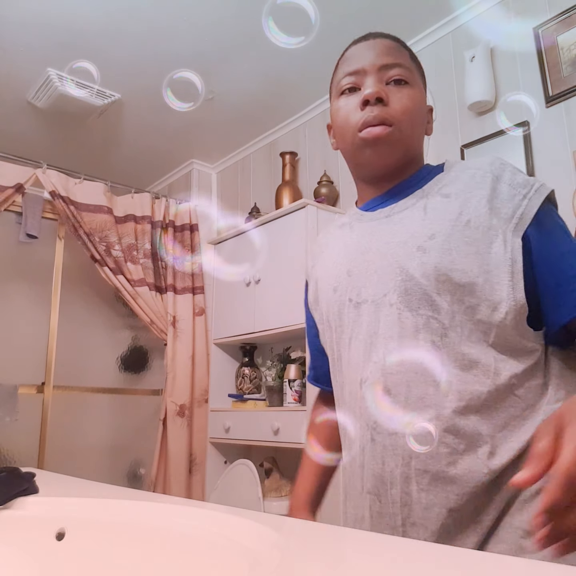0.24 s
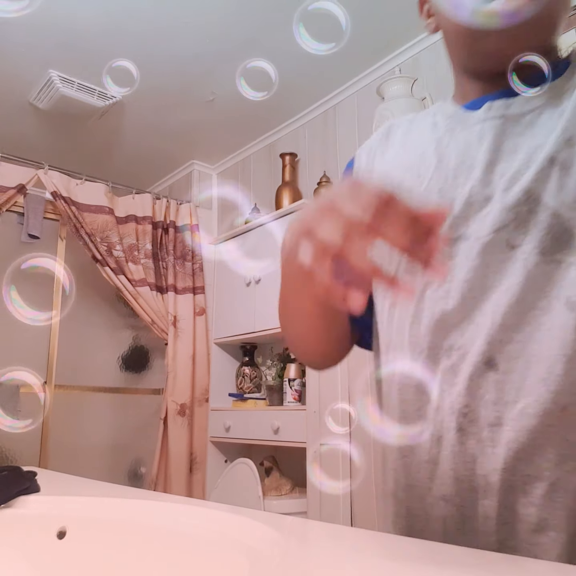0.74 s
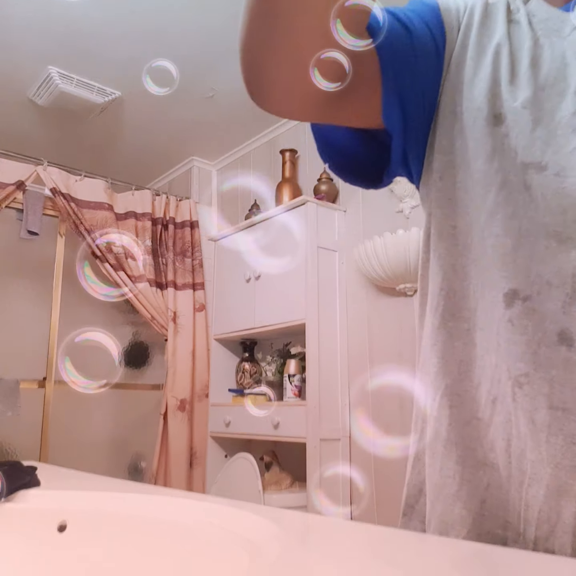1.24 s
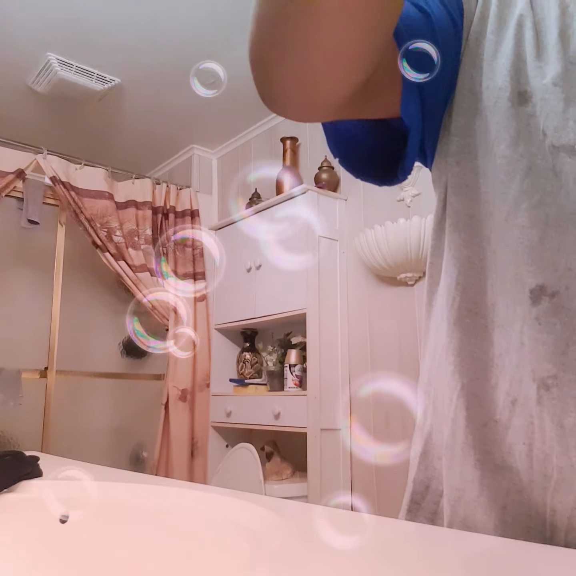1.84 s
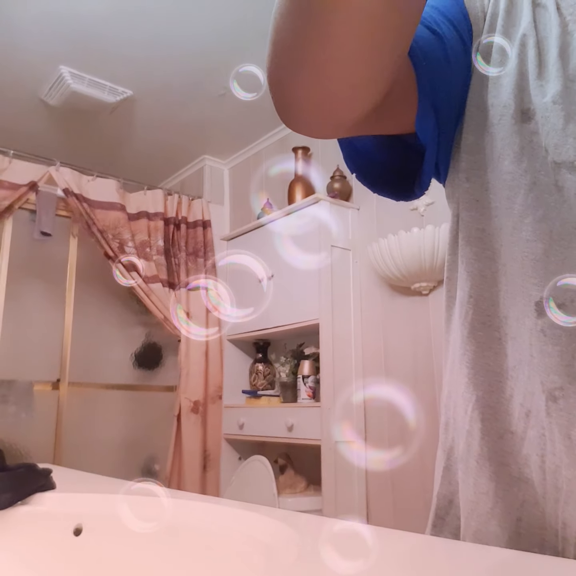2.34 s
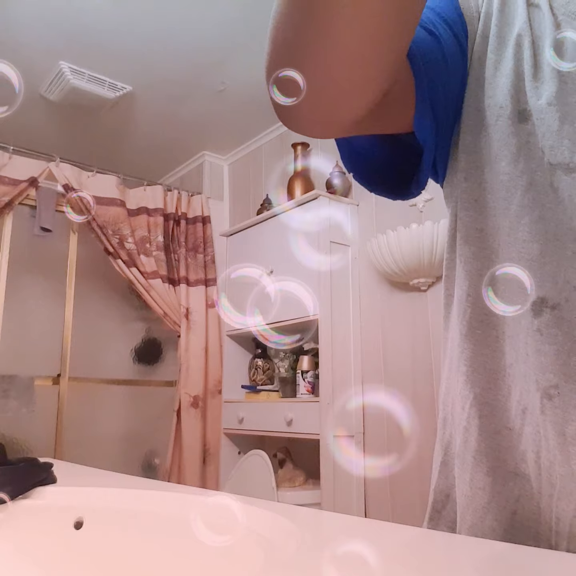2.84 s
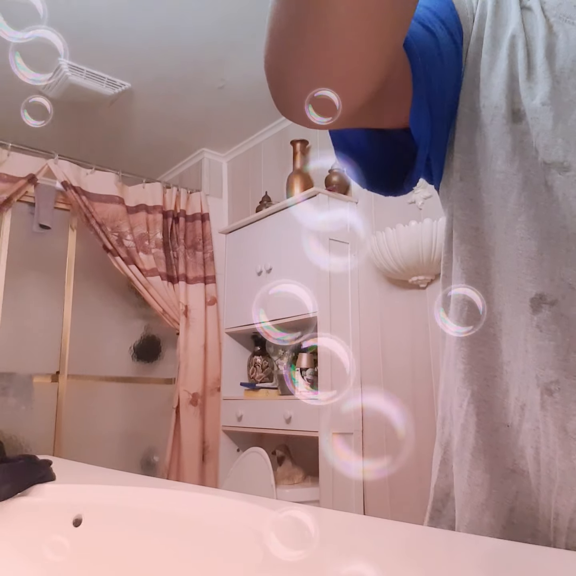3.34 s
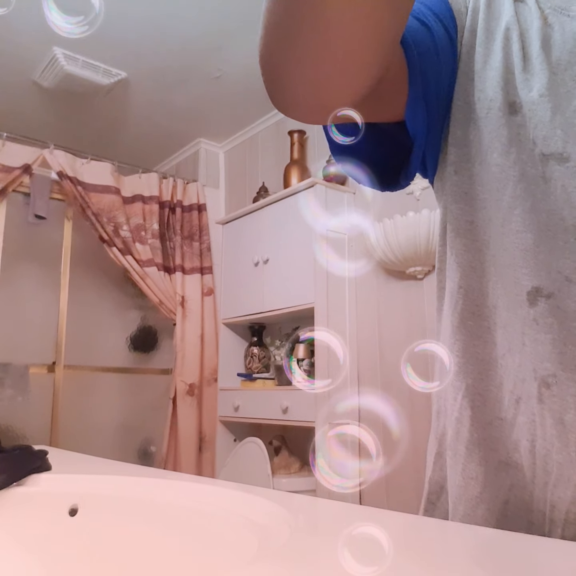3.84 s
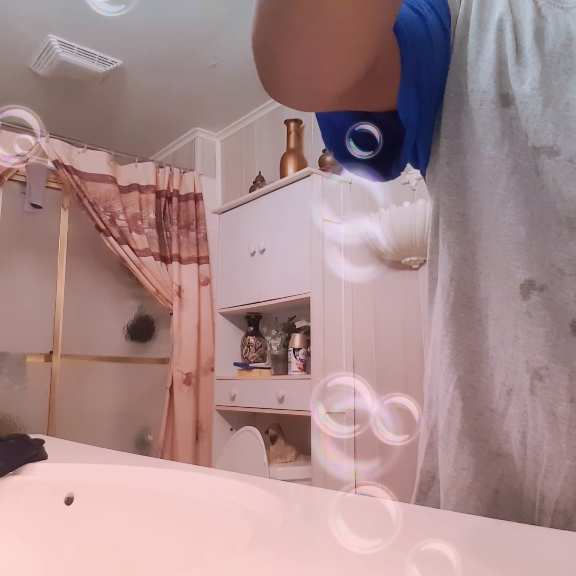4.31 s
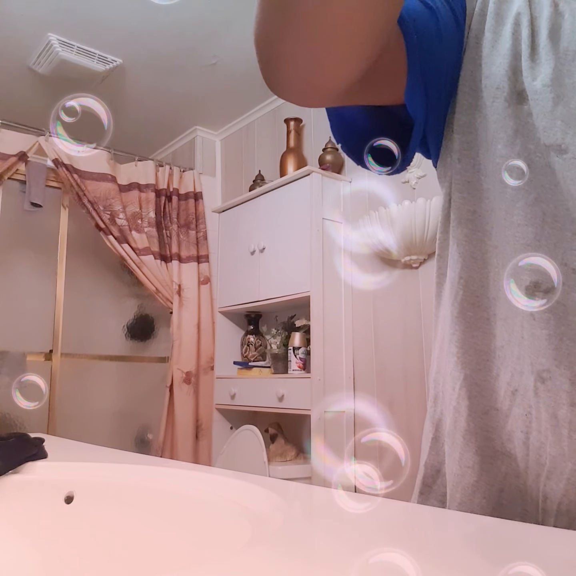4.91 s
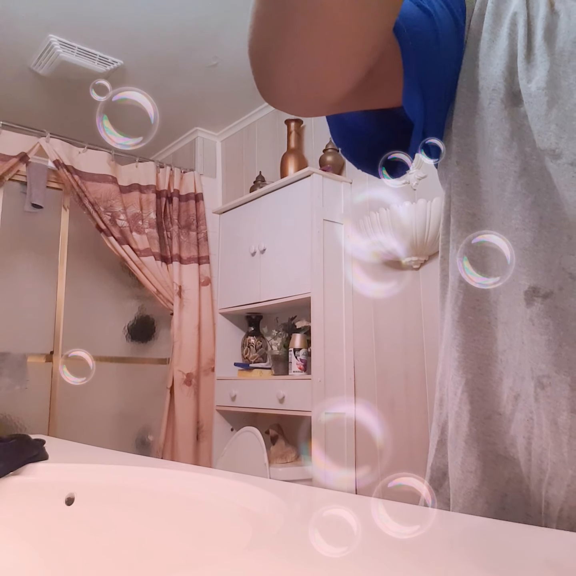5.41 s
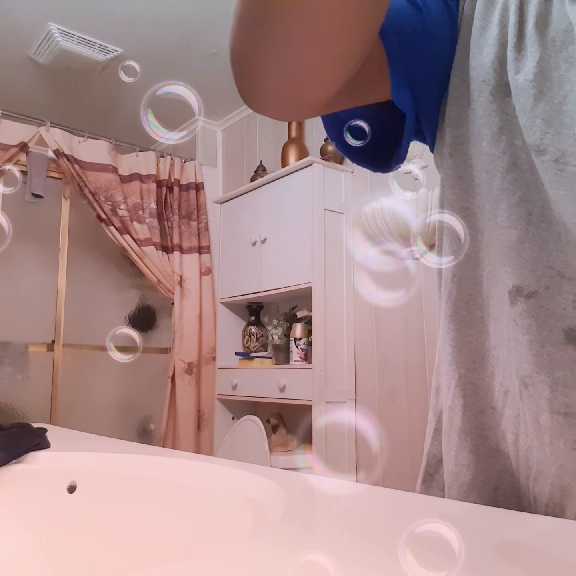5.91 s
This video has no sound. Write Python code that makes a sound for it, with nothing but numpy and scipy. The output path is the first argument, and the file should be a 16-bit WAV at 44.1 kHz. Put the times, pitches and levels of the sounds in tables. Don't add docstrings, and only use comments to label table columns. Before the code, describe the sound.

After faint rumble and hiss, a paper towel is crumpled sharply with snaps and knocks close to the microphone, then smoothed in lighter rustles.

```python
import sys
import numpy as np
from scipy import signal
from scipy.fft import rfft, irfft
from scipy.io import wavfile

SR = 44100
rng = np.random.default_rng(int(sys.argv[2]) if len(sys.argv) > 2 else 0)


def level_to_linear(level):
    exponent = np.asarray(level, float) / 20
    return 10 ** exponent


def to_wav(sig):
    pcm = np.clip(np.atleast_2d(sig), -1, 1) * 32767
    pcm = np.round(pcm).astype(np.int16)
    wavfile.write(sys.argv[1], SR, pcm.T)


N = 271656

# peak t/s, fibre level/dB, swell/s per 10 dB, fade/s per 10 dB, casing ring re fibre/dB
CRUMPLE_STROKES = [(1.3, -65, .1, .6, 3), (1.445, -56, .01, .1, 4), (1.56, -57, .2, .3, 3),
                   (1.69, -53, .1, .15, 5), (1.885, -46, .13, .14, 9), (2.01, -47, .03, .12, 5),
                   (2.096, -50, .006, .3, 8), (2.117, -51, .3, .02, 8), (2.17, -58, .1, .3, 13),
                   (2.246, -50, .004, .3, 9), (2.302, -47.5, .1, .05, 6), (2.38, -50, .04, .05, 12),
                   (2.402, -35, .002, .3, 0), (2.522, -36.5, .02, .08, 0), (2.575, -37, .12, .3, 0),
                   (2.657, -38, .02, .08, 0), (2.74, -42, .02, .1, 0), (2.82, -39, .06, .12, 1),
                   (2.9, -45, .3, .25, 3), (2.982, -51, .5, .04, 3), (3.07, -51, .15, .06, 3),
                   (3.15, -57, .05, .12, 15), (3.199, -39, .003, .08, 9), (3.233, -50, .1, .025, 8),
                   (3.29, -61, .1, .2, 8), (3.365, -49, .022, .2, 10), (3.43, -41, .07, .1, 10),
                   (3.486, -49, .3, .016, 10), (3.505, -53, .004, .2, 15), (3.531, -40, .003, .9, 6),
                   (3.56, -39, .1, .9, 5), (3.66, -37.5, .5, .1, 6), (3.738, -46, .25, .01, 9)]
SMOOTHING_STROKES = [(3.83, -52, .15, .04, 14), (3.93, -52, .1, .15, 14), (4.015, -52.5, .02, .25, 14),
                     (4.13, -61, .2, .04, 17), (4.26, -63, .1, .3, 10), (4.345, -58, .04, .4, 4),
                     (4.4, -61, .4, .03, 4), (4.49, -63, .1, .3, 8), (4.59, -57, .05, .3, 6),
                     (4.718, -49.5, .08, .15, 5), (4.84, -52, .1, .15, 5), (5.02, -58, .15, .5, 10),
                     (5.175, -53, .14, .15, 13), (5.255, -51, .015, .08, 12), (5.316, -52, .004, .2, 12),
                     (5.357, -48, .02, .06, 13), (5.398, -48, .005, .3, 12), (5.435, -51, .3, .01, 12),
                     (5.5, -57, .4, .4, 6), (5.578, -48, .012, .15, 10), (5.64, -46, .1, .04, 10),
                     (5.69, -54, .1, .3, 12), (5.749, -47, .003, .11, 11), (5.89, -55, .1, .3, 6),
                     (5.927, -50, .004, .2, 8), (6.03, -48, .005, .3, 6), (6.125, -44.5, .06, .5, 14)]
# t/s, pressure/dB, skin slip re pressure/dB, cupping toward the high mode/dB, lean left-right/dB
GRIP = [(0.0, -46, -19, 0, 1.5), (0.21, -42, -15, 0, 4.5), (0.4, -49, -32, 0, 4), (1.15, -48, -21, 0, 2),
        (1.42, -45, -16, -2, 3), (2.0, -49, -7, -6, 7), (2.38, -44, -10, -5, 5), (2.55, -41, -17, 5, 5),
        (2.72, -43, -5, -4, 19), (2.95, -42, -9, -3, 13), (3.5, -48, -6, 4, 9), (3.66, -51, -3, 0, 1),
        (4.15, -54, -5, -4, 1), (5.03, -55, -3, -5, -1), (5.08, -40, -15, 2, 0), (5.33, -44, -10, 1, 0),
        (5.45, -55, 3, 5, -0.5), (6.16, -58, 0, 6, -0.5)]
# f/Hz, width/Hz, left-right likeness
CASING_MODES = [(1220, 300, .7), (1660, 400, .4)]
MODE_DB = [-2.2, -1.2]
# f/Hz, level/dB per Hz
FIBRE_COLOUR = [(1500, -5), (2200, -8), (3500, -9.5), (4950, -15.5), (6500, -18), (8000, -20)]
# f/Hz, level/dB per Hz
SIZZLE_COLOUR = [(6500, -24.5), (7600, -20.5), (9000, -3.5), (10400, -1.5), (12500, -1.5), (15800, -4)]
FOLD_EDGES = [1400, 2300, 3200, 4400, 5800, 8200]
# f/Hz, level/dB per Hz
PUSH_COLOUR = [(18, 11), (30, -3), (91, 4.5), (189, 1), (220, -4), (350, -11.5), (460, -45), (770, -120)]
# f/Hz, width/Hz
SCRUB_BANDS = [(360, 370), (680, 486)]
# t/s, peak level/dB, ring f/Hz, crack re ring/dB
SNAPS = [(1.874, -30.5, 1080, -20), (2.249, -34, 1180, 5), (2.257, -34, 1060, -16), (2.319, -33, 1140, -3),
         (2.38, -29, 1200, 6), (2.402, -17, 760, 4), (2.403, -16, 1600, -8), (2.435, -19, 1400, -12),
         (2.4515, -14, 1600, -12), (2.462, -18, 1400, -13), (2.522, -15, 1500, -11),
         (2.514, -25, 1100, -20), (2.554, -25, 1890, -5), (2.577, -23, 1120, 1), (2.656, -15, 1500, -3),
         (2.698, -15, 700, -29), (2.74, -21, 950, -1), (2.82, -22, 880, 3), (2.858, -22, 905, -16),
         (2.88, -14.5, 790, -17), (3.02, -36, 899, -17), (3.2, -20, 900, -11), (3.318, -38, 1470, 9),
         (3.529, -25, 1000, -4), (3.461, -25, 1700, -6), (3.626, -21, 1600, -6), (3.351, -30.5, 1290, -10),
         (3.376, -25, 1540, -5), (3.42, -25, 1020, 0.5), (3.445, -27, 970, -16), (3.504, -33, 1240, -11),
         (3.535, -21, 1090, -4), (3.593, -12.5, 1300, -18), (3.611, -13, 1400, -16), (3.517, -26, 1500, -3),
         (3.65, -20, 850, -14), (3.694, -24, 1500, -10)]
LIGHT_SNAPS = [(3.878, -30, 1300, -6), (3.894, -32, 1190, -8), (3.926, -30, 990, 2),
               (4.012, -25.5, 1570, -9), (4.054, -32, 1240, -2), (4.081, -32, 1270, -2),
               (5.154, -33.5, 1050, -6), (5.17, -26.5, 1640, -11), (5.251, -27, 1460, -1),
               (5.257, -25, 1500, -10), (5.316, -27, 1600, -8), (5.355, -18, 1450, -14),
               (5.399, -25, 1750, -8), (5.573, -28, 1410, -15), (5.632, -17, 1500, -12),
               (5.751, -30, 1740, 0), (5.579, -25, 1400, -10), (5.757, -27, 1700, -10),
               (5.771, -26, 1500, -10), (5.783, -27, 1600, -10), (5.806, -31, 1700, -12),
               (5.863, -34, 1700, -12), (5.932, -25, 1500, -16), (6.04, -29, 1750, -12),
               (6.127, -21, 1750, -10), (6.138, -21, 1800, -8), (5.416, -28, 1600, -6),
               (5.927, -24, 1600, -14), (6.031, -17, 1650, -7), (6.0485, -20, 1650, -8),
               (6.068, -22, 1700, -10), (6.095, -28, 1650, -4), (6.122, -18, 1450, -10)]
# f/Hz, level/dB per Hz
CRACK_COLOUR = [(1300, -4), (2500, -4), (4950, -8), (7600, -20), (9000, -9), (12500, -6), (15800, -9)]
# t/s, peak level/dB, ring f/Hz, low swing re peak/dB
KNOCKS = [(2.401, -17, 615, 4), (2.432, -26, 301, -4), (2.451, -29, 224, 2), (2.46, -33, 220, 13),
          (2.523, -27, 256, -20), (2.611, -19, 317, -14), (2.656, -17, 358, -5), (2.676, -26, 220, 0),
          (2.69, -16, 239, -9), (2.697, -20, 300, -31), (2.739, -28, 221, -16), (2.819, -17, 280, -27),
          (2.823, -10.5, 655, -17), (2.858, -19, 800, -25), (2.88, -9.5, 513, -8), (2.997, -34, 220, -1),
          (3.018, -34, 210, -15), (3.2, -28.5, 218, 7.5), (3.219, -32, 546, -4), (3.421, -24, 260, -5),
          (3.446, -28, 300, -5), (3.533, -31.5, 323, 2), (3.546, -24, 225, 2), (3.562, -27, 226, -10),
          (3.594, -15, 330, -24), (3.613, -23, 221, -5), (3.665, -27, 221, -10), (3.681, -28, 300, 5)]
BUMPS = [(1.438, -44, 600, 3), (1.693, -49, 440, 11), (1.732, -39, 330, -8), (2.102, -44, 336, 9),
         (3.899, -48, 538, 14.5), (4.78, -53, 649, 14), (5.075, -41, 216, -5), (5.272, -40, 525, -20),
         (5.31, -45, 300, 11), (5.355, -29, 760, -25), (5.75, -29, 720, -30), (5.153, -45, 300, 10),
         (6.031, -29, 620, -30), (6.095, -39, 700, -25)]
# start t/s, length/s, level/dB,
# from f/Hz, to f/Hz
SLIDES = [(0.495, .14, -38, 62, 82), (2.603, .03, -29, 300, 420), (2.655, .06, -28, 380, 260),
          (2.75, .07, -32, 500, 760), (2.82, .05, -31, 700, 450), (2.885, .09, -39, 1000, 1150),
          (3.125, .055, -43, 1300, 1600), (3.43, .04, -36, 1750, 1800), (4.66, .1, -53, 1200, 1250),
          (2.402, .05, -25, 130, 95), (2.403, .015, -29, 550, 450), (3.53, .05, -29, 210, 180),
          (3.6, .1, -37, 200, 200), (3.198, .025, -31, 150, 110), (3.36, .1, -36, 190, 170),
          (3.2, .04, -33, 560, 500)]
# t/s, peak level/dB, pitch f/Hz
POPS = [(2.611, -24, 900), (2.679, -22, 700), (3.349, -28, 500), (3.422, -20, 700), (3.446, -23, 800),
        (3.504, -30, 500), (3.537, -22, 800), (3.668, -11, 1150), (3.679, -15, 1150), (3.822, -31, 900),
        (3.928, -28, 900), (4.021, -31, 900), (5.29, -28, 1300), (5.459, -36, 1900), (5.468, -25, 850),
        (5.484, -36, 1900), (5.531, -25, 900), (5.553, -23.5, 1000), (5.601, -26, 800), (5.611, -28, 800),
        (5.637, -16, 900)]
# t/s, peak level/dB
TICKS = [(1.4692, -35), (2.0023, -32.5), (2.0447, -28), (2.1041, -31.5), (2.0935, -35), (2.137, -33),
         (2.16, -32), (2.174, -35), (2.185, -34), (2.208, -35), (3.667, -20), (3.034, -32), (3.081, -34),
         (2.226, -26), (2.2855, -32), (2.334, -37), (2.355, -36), (2.366, -33), (1.444, -36), (1.7177, -38),
         (3.019, -32), (3.241, -31), (3.985, -33), (4.033, -33), (4.5925, -37), (4.982, -41), (5.102, -33),
         (5.956, -35), (2.666, -24), (2.245, -30), (2.4128, -18.5), (2.995, -30), (3.2306, -26.5),
         (3.2555, -31), (3.8215, -30), (3.143, -40), (4.123, -41.5), (5.2909, -26)]
# t/s, peak level/dB, ring f/Hz
TAPS = [
    (1.4098, -39, 1260),
    (1.4361, -24.5, 1197),
    (1.4694, -45, 1000),
    (1.493, -39, 1240),
    (1.7177, -39, 1220),
    (1.7295, -31.5, 1270),
]
# start t/s, length/s, level/dB, band f/Hz, width/Hz
SWISHES = [
    (0.93, 0.5, -59.5, 4700, 3600),
    (4.57, 0.07, -52, 3700, 600),
    (4.63, 0.15, -51, 3650, 500),
    (1.74, .3, -60, 6500, 500),
    (1.05, .25, -66, 9500, 900),
    (4.575, 0.06, -56, 5100, 700),
    (4.8, .14, -60, 5000, 900),
]
# t/s, level/dB
RUMBLE_LEVEL = [(0.0, -55.5), (2.18, -54), (2.59, -47), (2.86, -59), (4.51, -62), (6.16, -57)]
# f/Hz, level/dB per Hz
RUMBLE_COLOUR = [(20, 2.5), (49, 3.5), (75, -1.5), (135, -8), (212, -25), (400, -26), (900, -47)]
# f/Hz, level/dB per Hz
HISS_COLOUR = [(900, -12), (1400, -18), (4000, -19), (7600, -23), (9500, -13), (12100, -8), (15900, -12)]
# t/s, level/dB
HISS_GAIN = [(0.0, -3), (0.45, -4.5), (0.56, 0), (6.16, 0)]

MEAN_STROKE_DB, REST_DB = -55, -70
BRIGHT_RING_HZ = 1420


def rms_one(x):
    return x / np.sqrt(np.mean(x ** 2) + 1e-20)


def rise(t, time_s):
    return 1 - np.exp(-t / time_s)


def decay(t, t60_s):
    return level_to_linear(-60 * t / t60_s)


def in_time(rows):
    s, *columns = np.transpose(rows)
    return [np.interp(np.arange(N) / SR, s, column) for column in columns]


def panned(pan_db):
    left, right = level_to_linear(pan_db / 2), level_to_linear(-pan_db / 2)
    return np.array([left, right]) * np.sqrt(2 / (left ** 2 + right ** 2))


def lean(share):
    return 0.6 + share * in_time(GRIP)[-1]


def drift(rate):
    r = np.exp(-16 * np.pi * rate / SR)
    noise = rng.standard_normal(N // 8 + 4002)
    slow = signal.lfilter([1], [1, -2 * r, r * r], noise)[4000:]
    return np.interp(np.arange(N) / 8, np.arange(len(slow)), rms_one(slow))


def colour(x, spectrum):
    hz = np.maximum(np.fft.rfftfreq(x.shape[-1], 1 / SR), 1)
    at, level = np.transpose(spectrum)
    octaves_outside = np.maximum(np.log2(at[0] / hz), 0) + np.maximum(np.log2(hz / at[-1]), 0)
    gain = level_to_linear(np.interp(np.log(hz), np.log(at), level) - 90 * octaves_outside)
    return rms_one(irfft(rfft(x) * gain, x.shape[-1]))


def resonate(x, hz, width_hz):
    r = np.exp(-np.pi * width_hz / SR)
    poles = [1, -2 * r * np.cos(2 * np.pi * hz / SR), r * r]
    return signal.lfilter((1 - r * r) / 2 * np.array([1, 0, -1]), poles, x)


def at_ports(noise, alike):
    alike = np.clip(alike, -1, 1)
    return np.array([noise[0], alike * noise[0] + np.sqrt(1 - alike ** 2) * noise[1]])


def across(noise, alike):
    left, right = at_ports(noise, alike)
    return np.array([left, np.roll(right, 9)])


def sideways(noise, alike):
    alike = np.clip(alike, -1, 1)
    quarter = signal.hilbert(noise[0]).imag
    return np.array([noise[0], alike * quarter + np.sqrt(1 - alike ** 2) * noise[1]])


def grains(per_s, spread_db, clump, smooth):
    born = rng.random(N) < per_s * clump / SR
    sizes = level_to_linear(spread_db * np.minimum(rng.exponential(1, N), 3.5)) * born
    clicks = rms_one(sizes * rng.standard_normal((2, N)))
    friction = np.sqrt(clump / clump.mean()) * rng.standard_normal((2, N))
    share = np.clip(smooth, 0, 1)
    return np.sqrt(1 - share) * clicks + np.sqrt(share) * friction


def strokes():
    peak_s, level_db, swell_s, fade_s, ring_db = np.transpose(CRUMPLE_STROKES + SMOOTHING_STROKES)
    t = np.arange(N) / SR
    coming = np.searchsorted(peak_s, t)
    last, ahead = np.maximum(coming - 1, 0), np.minimum(coming, len(peak_s) - 1)
    fade_db = 10 * (t - peak_s[last]) / np.maximum(fade_s[last], 1e-3)
    swell_db = 10 * (peak_s[ahead] - t) / np.maximum(swell_s[ahead], 1e-3)
    fading = level_to_linear(level_db[last] - fade_db) * (coming > 0)
    swelling = level_to_linear(level_db[ahead] - swell_db) * (coming == ahead)
    fibre = np.hypot(fading, swelling)
    ring = np.hypot(fading * level_to_linear(ring_db[last]), swelling * level_to_linear(ring_db[ahead]))
    return 20 * np.log10(fibre + 1e-6), 20 * np.log10(ring + 1e-6)


def folds(x):
    out = 0
    for k, edges in enumerate(zip(FOLD_EDGES, FOLD_EDGES[1:])):
        band = signal.sosfilt(signal.butter(2, edges, "band", fs=SR, output="sos"), x)
        out = out + (-1) ** k * level_to_linear(1.8 * drift(9)) * band
    return rms_one(out)


def drag():
    fibre_db, ring_db = strokes()
    _, _, cupping_db, lean_db = in_time(GRIP)
    sizzle_db = MEAN_STROKE_DB + 0.1 + 0.99 * (fibre_db - MEAN_STROKE_DB) - 0.2 * lean_db
    clump = level_to_linear(1.8 * drift(30) + 3.0 * drift(100))
    coarse = grains(1000, 2.6, clump, smooth=0.35)
    fine = grains(1500, 2.7, clump, smooth=0.62)
    out = level_to_linear(fibre_db + 2.8) * folds(colour(across(fine, 0.3), FIBRE_COLOUR))
    out += level_to_linear(sizzle_db + 0.2) * colour(fine, SIZZLE_COLOUR)
    mode_levels = (MODE_DB[0] - cupping_db / 2, MODE_DB[1] + cupping_db / 2)
    for (hz, width_hz, alike), mode_db in zip(CASING_MODES, mode_levels):
        ring = resonate(resonate(across(coarse, alike), hz, width_hz), hz, 2 * width_hz)
        out += level_to_linear(ring_db + mode_db - 4.8) * rms_one(ring)
    return out * panned(lean(0.1))


def grip():
    pressure_db, slip_db, _, pan_db = in_time(GRIP)
    swing_db = np.maximum(strokes()[0], REST_DB) - MEAN_STROKE_DB
    clump = level_to_linear(3.9 * drift(16))
    pushes = sideways(grains(80, 1.44, clump, smooth=0.72), 0.65)
    out = level_to_linear(pressure_db + 0.7 * swing_db - 2.0) * colour(pushes, PUSH_COLOUR)
    slips = sideways(grains(500, 1.5, clump, smooth=0.7), 0.6)
    for (hz, width_hz), band_db in zip(SCRUB_BANDS, (0.3, -5.5)):
        scrub = rms_one(resonate(resonate(slips, hz, width_hz), hz, 2 * width_hz))
        out += level_to_linear(pressure_db + slip_db + 0.8 * swing_db + band_db + 2.0) * scrub
    return out * panned(pan_db)


def snaps():
    events = SNAPS + LIGHT_SNAPS
    out, t = np.zeros((2, N + 3000)), np.arange(3000) / SR
    chance = rng.standard_normal((len(events), 2, 2, 3000))
    cracks = colour(chance[:, 0], CRACK_COLOUR)
    dull, bright = lean(0.98), lean(0.45)
    load = rise(t, 0.0006)
    slip_shape = load * (decay(t, 0.0055) + 0.07 * decay(t, 0.045))
    tear_shape = load * (decay(t, 0.011) + 0.32 * decay(t, 0.086))
    for (s, peak_db, ring_hz, crack_db), noise, crack in zip(events, chance[:, 1], cracks):
        high = ring_hz > BRIGHT_RING_HZ
        contact = across(noise, CASING_MODES[int(high)][2]) * slip_shape
        ring = resonate(resonate(contact, ring_hz, 560.0), ring_hz, 800.0)
        ring = ring / np.abs(ring).max(axis=1, keepdims=True)
        snap = 1.35 * level_to_linear(-2.5 * high) * ring + level_to_linear(crack_db - 5.0) * crack * tear_shape
        i = round(s * SR)
        toward = dull if ring_hz < 1150 else bright
        out[:, i:i + 3000] += level_to_linear(peak_db) * snap * panned(toward[i])[:, None]
    return out[:, :N]


def knocks():
    events = KNOCKS + BUMPS
    out, t = np.zeros((2, N + 6000)), np.arange(6000) / SR
    chance = rng.random((len(events), 4))
    toward = lean(0.85)
    detune = np.array([[1], [1.13]])
    for (s, peak_db, ring_hz, swing_db), (pitch, sign, ahead, place) in zip(events, chance):
        i = round(s * SR)
        turn = np.array([[0], [1.4 * np.sign(ahead - 0.5)]])
        ring = np.sin(2 * np.pi * ring_hz * detune * t + turn) * rise(t, 0.0003) * decay(t, 5.84 / ring_hz)
        swing_hz = (80 + 35 * pitch) * (0.7 if swing_db > 15 else 1)
        swing = np.sin(2 * np.pi * swing_hz * t + turn) * rise(t, 0.004) * decay(t, 0.09)
        gains = panned(toward[i] + 3.0 * (2 * place - 1)) * np.sign(sign - 0.5)
        blow = 2.14 * ring - 1.32 * level_to_linear(swing_db) * swing
        out[:, i:i + 6000] += level_to_linear(peak_db) * gains[:, None] * blow
    return out[:, :N]


def slides():
    out, toward = np.zeros((2, N)), lean(0.9)
    for start_s, long_s, level_db, from_hz, to_hz in SLIDES:
        i, along = round(start_s * SR), np.linspace(0, 1, round(long_s * SR))
        noise = rng.standard_normal((2, 2, SR // 4))
        half_width_hz = 0.45 * (from_hz + to_hz) / 4
        lowpass = signal.butter(2, half_width_hz, fs=SR, output="sos")
        rough = signal.sosfilt(lowpass, noise)[..., -len(along):]
        phase = 2 * np.pi * np.cumsum(from_hz + (to_hz - from_hz) * along) / SR
        band = at_ports(rough[:, 0] * np.cos(phase) + rough[:, 1] * np.sin(phase), 0.5)
        swell = np.sqrt(np.abs(np.sin(np.pi * along)))
        out[:, i:i + len(along)] += level_to_linear(level_db) * rms_one(band) * swell * panned(toward[i])[:, None]
    return out


def pops():
    out, t = np.zeros((2, N)), np.arange(600) / SR
    toward = lean(0.4)
    for s, peak_db, pitch_hz in POPS:
        i = round(s * SR)
        shape = rise(t, 1 / (12 * pitch_hz)) * decay(t, 3.4 / pitch_hz)
        pulse = np.sin(2 * np.pi * pitch_hz * t) * shape
        out[:, i:i + 600] -= level_to_linear(peak_db + 2) * pulse * panned(toward[i])[:, None]
    return out


def ticks():
    out, t = np.zeros((2, N)), np.arange(1500) / SR
    puffs = colour(rng.standard_normal((len(TICKS), 2, 1500)), CRACK_COLOUR)
    shape = decay(t, 0.016) + 0.25 * decay(t, 0.06)
    for (s, peak_db), puff in zip(TICKS, puffs):
        i = round(s * SR)
        out[:, i:i + 1500] += level_to_linear(peak_db - 7.5) * shape * puff
    return out


def taps():
    out, t = np.zeros(N), np.arange(3000) / SR
    shape = rise(t, 0.002) * decay(t, 0.042)
    for s, peak_db, ring_hz in TAPS:
        i = round(s * SR)
        out[i:i + 3000] += level_to_linear(peak_db) * shape * np.sin(2 * np.pi * ring_hz * t)
    return 1.1 * out * panned(4.0)[:, None]


def sleeve():
    out, noise = np.zeros((2, N)), rng.standard_normal((2, N))
    sizzle, flicker_db = 1.1 * colour(noise, SIZZLE_COLOUR), 2.5 * drift(25)
    for start_s, long_s, level_db, hz, width_hz in SWISHES:
        along = np.clip((np.arange(N) / SR - start_s) / long_s, 0, 1)
        swell = np.abs(np.sin(np.pi * along)) * (along < 1)
        band = rms_one(resonate(resonate(noise, hz, width_hz), hz, width_hz))
        out += level_to_linear(level_db + flicker_db) * swell * (band + sizzle)
    return out


def room(x):
    t = np.arange(SR // 3) / SR
    tail = rng.standard_normal((2, len(t))) * decay(t, 0.083) * (t > 0.004)
    tail /= np.sqrt(np.sum(tail ** 2, axis=1, keepdims=True))
    airborne = signal.sosfilt(signal.butter(1, [500, 6000], "band", fs=SR, output="sos"), x)
    return level_to_linear(-27) * signal.fftconvolve(airborne, tail, axes=1)[:, :N]


def floor():
    shared = at_ports(rng.standard_normal((2, N)), 1.0)
    rumble = colour(shared, RUMBLE_COLOUR) * level_to_linear(in_time(RUMBLE_LEVEL)[0] + 2.5)
    hiss = level_to_linear(-66.5 + in_time(HISS_GAIN)[0]) * colour(rng.standard_normal((2, N)), HISS_COLOUR)
    return rumble * panned(1.3)[:, None] + hiss


def scene():
    contact = drag() + grip() + snaps() + knocks() + taps() + ticks() + sleeve() + pops() + slides()
    build_s = 0.0013
    contact = np.pad(contact, ((0, 0), (round(build_s * SR), 0)))[:, :N]
    return contact + room(contact) + floor()


def band_limit(x):
    return signal.sosfilt(signal.butter(12, 16660, fs=SR, output="sos"), x)


def record(dry):
    rounded = 1.31 * np.tanh(dry / 0.94)
    mix = signal.sosfilt(signal.cheby2(20, 60, 16200, fs=SR, output="sos"), rounded)
    return band_limit(mix)


dry = scene()
out = record(dry)
to_wav(out)
```